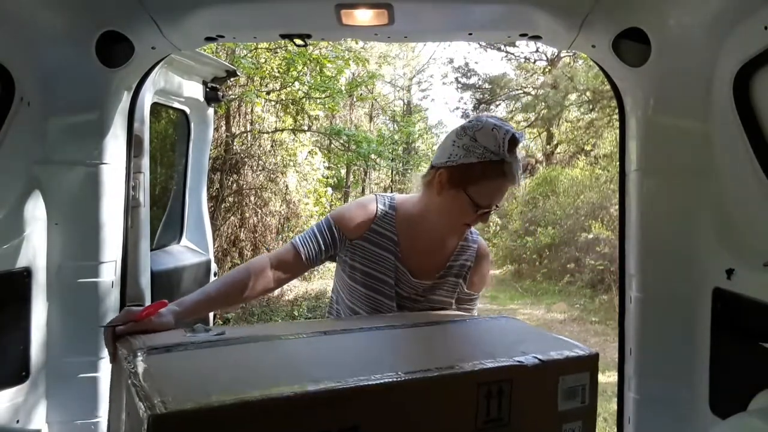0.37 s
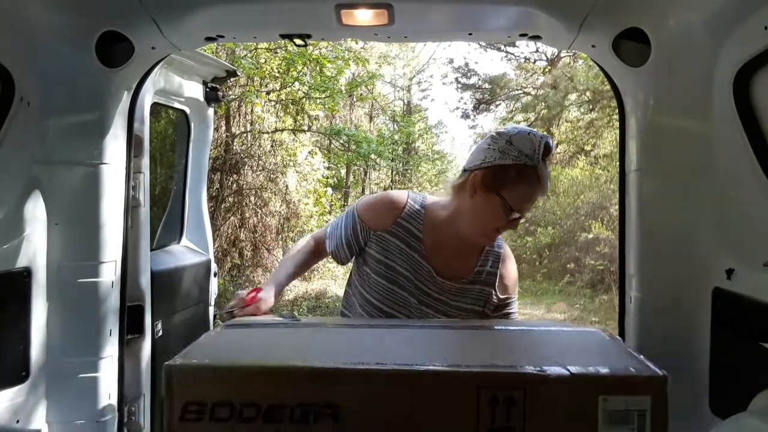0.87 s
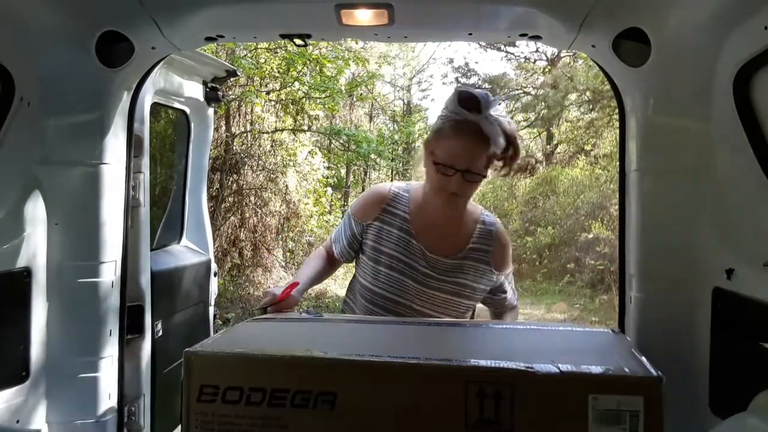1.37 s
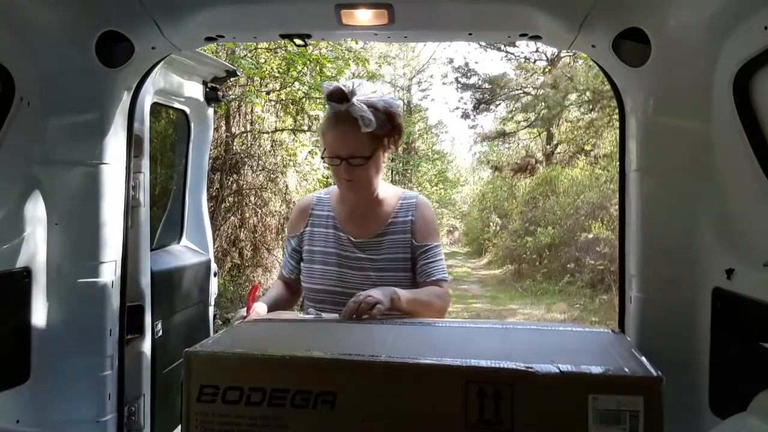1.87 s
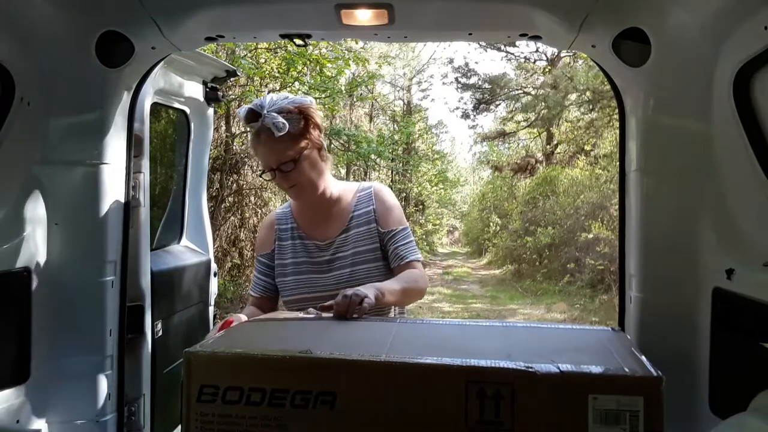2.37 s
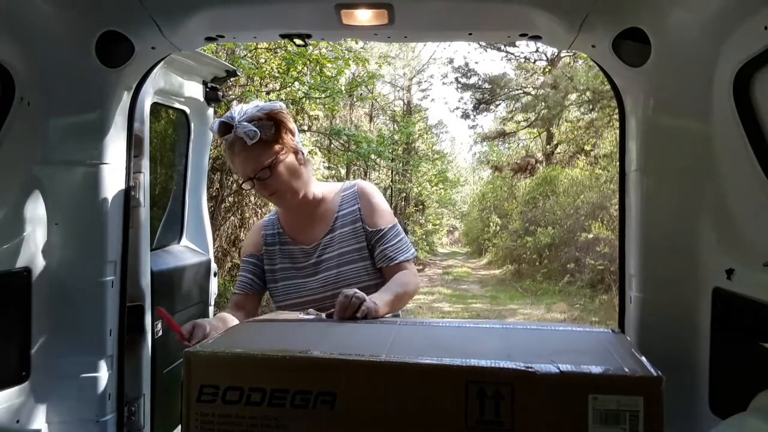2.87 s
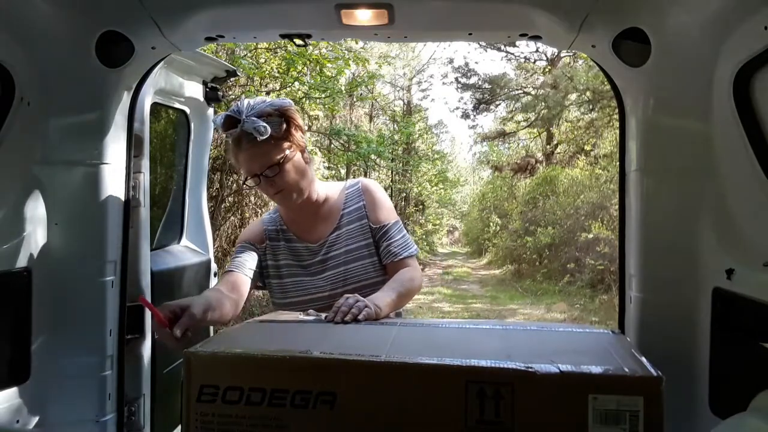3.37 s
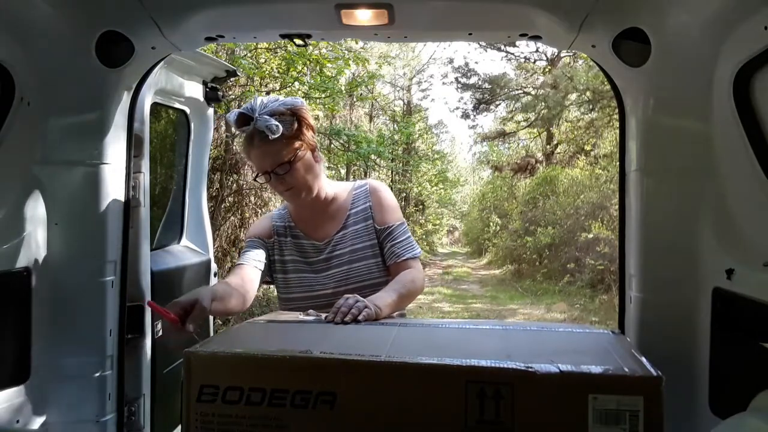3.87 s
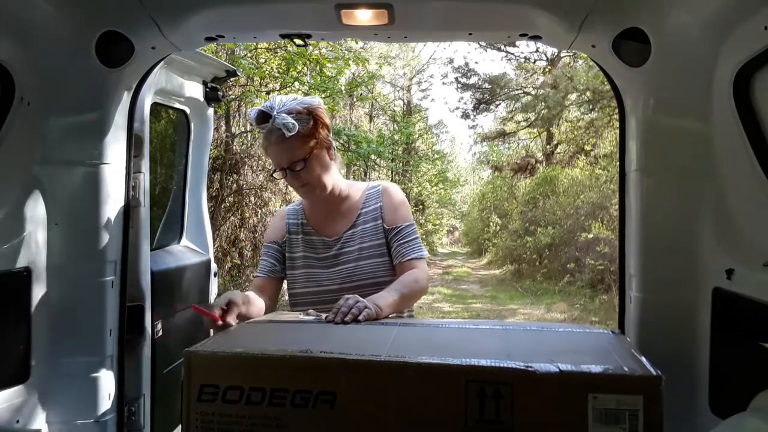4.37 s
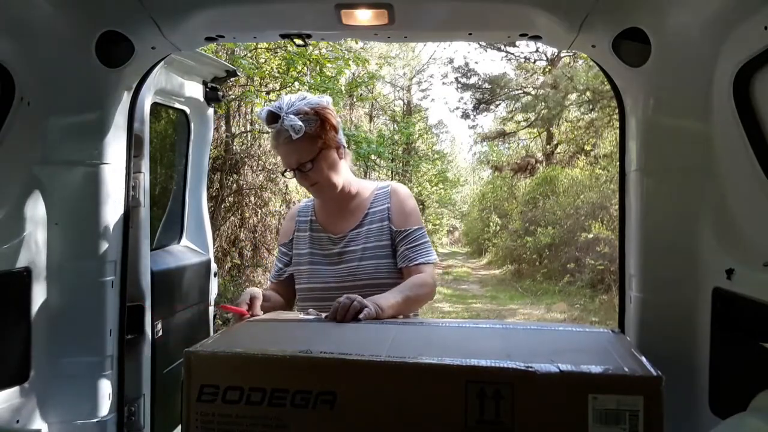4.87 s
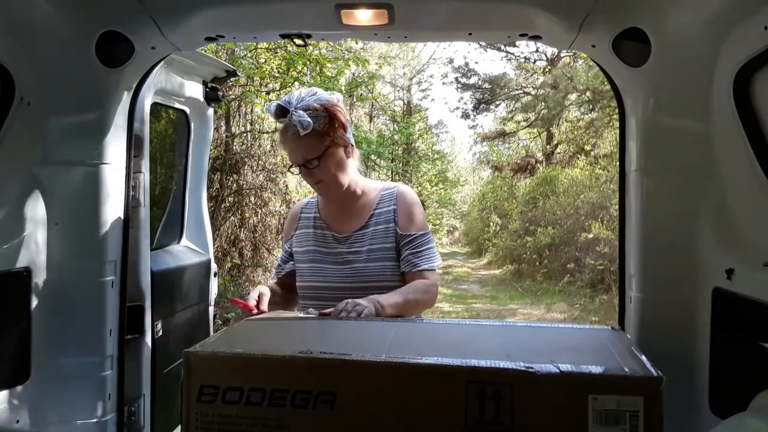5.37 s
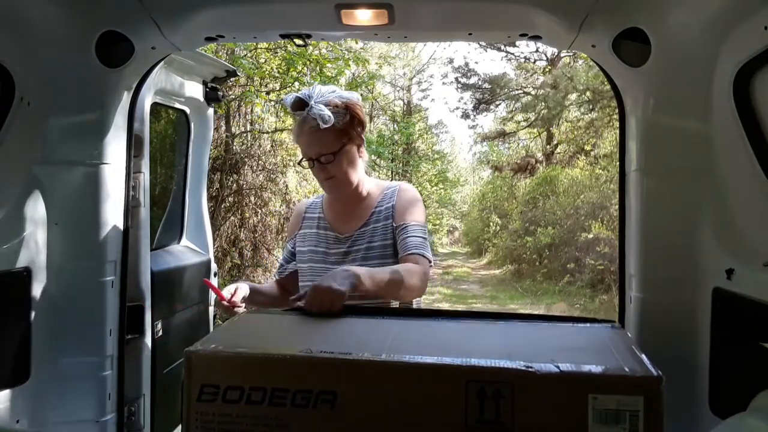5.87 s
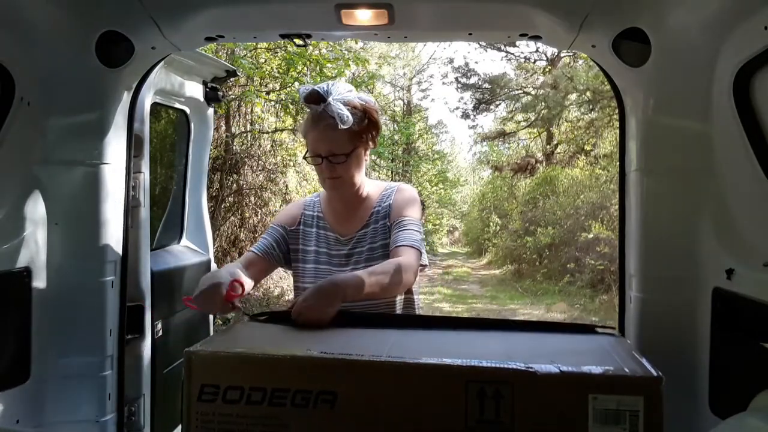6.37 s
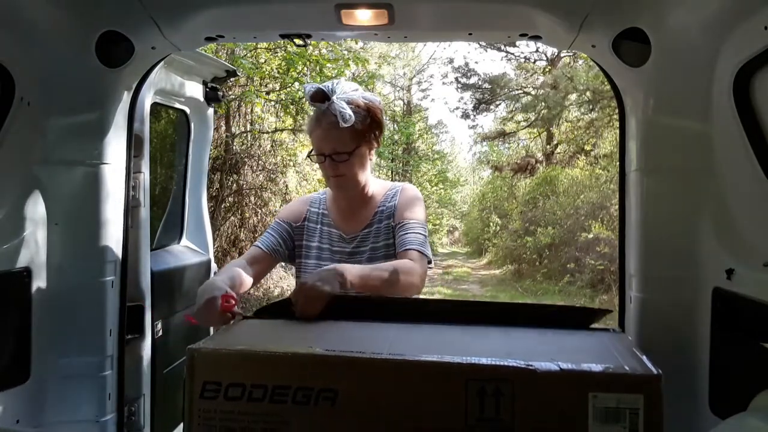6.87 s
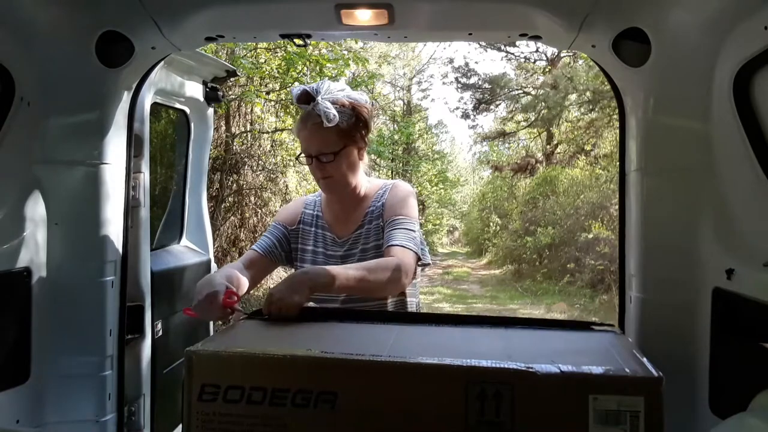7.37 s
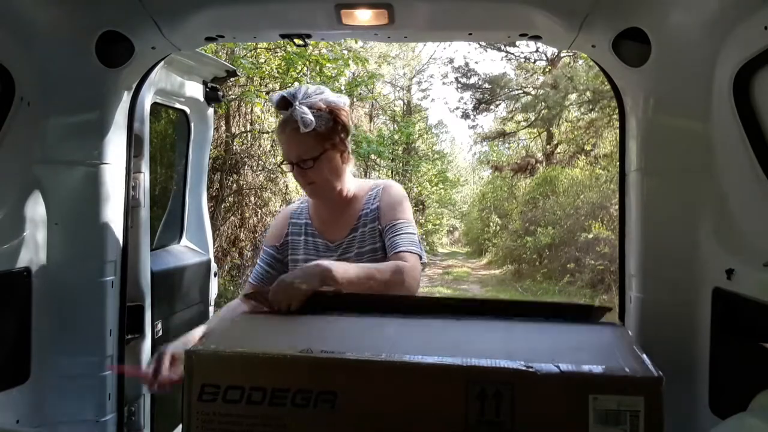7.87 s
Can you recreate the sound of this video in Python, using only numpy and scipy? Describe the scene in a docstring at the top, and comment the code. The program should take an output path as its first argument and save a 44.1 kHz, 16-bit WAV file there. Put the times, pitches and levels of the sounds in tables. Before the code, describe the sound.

Heard close inside the open back of a van: a large cardboard box is brushed, then dragged round with hollow scraping and dull knocks. Light rustles and a quiet gap follow. A scissor blade rasps along a taped seam, hands fumble at the flaps, and tape cracks before one hard, boomy knock. Faint leaves and distant rumble lie outside, with a very weak insect rasp midway.

```python
"""Hands and flaps brush a large cardboard box; then it is dragged round in the open back of a van, a scissor
blade is drawn along its taped seams, and flaps are knocked and pulled until the tape snaps. Friction and
blows are shaped noise: they excite the box's damped modes, and rasp and hiss directly at the contact.
The bare metal cabin answers with brief decaying noise; outside, filtered noise gives leaves, far-off
rumble and insects that rasp faintly in one band."""
import sys
import numpy as np
from scipy import signal
from scipy.fft import rfft, irfft
from scipy.io import wavfile
from scipy.ndimage import uniform_filter1d

SR = 44100
rng = np.random.default_rng(int(sys.argv[2]) if len(sys.argv) > 2 else 0)


def gain_from_db(level_db):
    """Turn a decibel level (scalar or array-like) into a linear amplitude factor."""
    decades = np.asarray(level_db, float) / 20
    return 10 ** decades


def inscribe(sig):
    """Save sig as 16-bit PCM at rate SR to the path in sys.argv[1].

    A 1-D sig is mono; a 2-D sig holds one channel per row.
    Samples are clipped to [-1, 1] before scaling.
    """
    pcm = np.round(np.clip(np.atleast_2d(sig).T, -1, 1) * 32767)
    wavfile.write(sys.argv[1], SR, pcm.astype(np.int16))


N = 352359
T = np.arange(N) / SR

# Leaves and far-off rumble, spectrum: hz, level_db
OUTSIDE_SPECTRUM = [(15, -43.5), (25, -3), (131, 1), (368, -11), (553, -11), (952, -15), (12600, -21),
                    (16500, -22)]
OUTSIDE_DB = -70.5
INSECT_HZ, INSECT_WIDTH_HZ, INSECT_DB = 2570, 700, -72.5
INSECT_FROM_S, INSECT_TO_S = 3.3, 5.2  # fullest between these times
INSECT_RISE_DB_PER_S, INSECT_FALL_DB_PER_S = 11, 12

# Cabin: decay time, build-up time constant, energy of the mid reflections
CABIN_T60_S, CABIN_BUILD_S, CABIN_DB = 0.12, 0.0045, 1.54
ALIKE_HZ = 800  # well below this the two channels are nearly alike

# An edge catches on the card and sings in one band: middle_s, spread_s, level_db, pitch_hz, width_hz
EDGE_BITES = [(0.018, 0.13, -51, 940, 302), (0.645, 0.062, -35, 1290, 695), (1.343, 0.15, -44.5, 643, 316),
              (1.805, 0.039, -51, 2110, 300), (4.007, 0.11, -39, 980, 597),
              (4.12, 0.055, -41.5, 2000, 1200), (6.033, 0.0058, -23, 630, 162),
              (6.056, 0.0091, -34.5, 14000, 3490), (7.554, 0.0077, -28, 1400, 700)]

# Long strokes, the box dragged round, then the blade along the seam; each a list of
# start_s, pressure_db, slip_db
LONG_STROKES = [
    [(0.39, -51, -6), (0.405, -29.5, -26.5), (0.45, -32.5, -17), (0.615, -37, -2.5), (0.79, -39, 5),
     (0.92, -38.5, 2), (0.97, -30, -10.5), (1.06, -30, -16), (1.15, -40.5, -27), (1.2, -34.5, -29.5),
     (1.3, -36.5, -34), (1.46, -42.5, -59.5), (1.69, -56, -50.5), (1.72, -70, -30.5)],
    [(3.57, -84, -12), (3.63, -56, -5), (3.67, -62, -9.5), (3.685, -46.5, -10), (3.83, -45, -11.5),
     (3.99, -38, -7.5), (4.29, -36.5, -5), (4.31, -40.5, -7), (4.36, -49, -10.5), (4.434, -36.5, -19.5),
     (4.49, -41.5, -8.5), (4.568, -39.5, 0), (4.62, -40, -3), (4.89, -42.5, -4), (4.95, -37, -9),
     (5.088, -39, -9), (5.14, -61, -26.5), (5.17, -75, -17)],
]
# Hands and flaps brush the card: start_s, length_s, pressure_db, slip_db
HAND_BRUSHES = [(.01, 0.09, -52, -4.5), (0.145, 0.14, -55.5, -2.5), (0.317, 0.17, -52, -5.5),
                (1.613, 0.013, -53, -8.5), (1.725, 0.065, -40.5, -2), (1.776, 0.085, -36.5, -20),
                (1.905, 0.046, -49.5, -6), (2.028, 0.062, -55.5, 0.5), (2.117, 0.11, -57, -4),
                (2.29, 0.014, -61.5, -2.5), (2.358, 0.051, -56, -7.5), (2.6, 0.017, -58.5, -3),
                (2.68, 0.28, -66.5, -7), (5.179, 0.062, -50.5, -7), (5.279, 0.074, -46.5, -3.5),
                (5.424, 0.073, -56, -1), (5.541, 0.12, -48.5, -6.5), (5.642, 0.06, -46.5, -4),
                (5.753, 0.081, -52, 3), (5.863, 0.11, -54.5, 7.5), (6.08, 0.03, -51, -4.5),
                (6.19, 0.043, -47, -4), (6.318, 0.15, -68.5, -1.5), (6.595, 0.064, -59, 4.5),
                (6.734, 0.13, -47.5, -3), (6.912, 0.091, -47, -23), (7.15, 0.09, -39, -16),
                (7.216, .12, -42, -7.5), (7.347, 0.12, -44, -17), (7.486, 0.027, -57, 2.5),
                (7.572, 0.069, -37.5, -6.5), (7.661, 0.11, -49.5, -4.5), (7.805, 0.089, -57.5, -7),
                (7.91, 0.085, -47.5, -5.5)]
BRUSH_RISE_DB_PER_S, BRUSH_SAG_DB, BRUSH_FALL_DB_PER_S = 455, 3, 297.5
# Slip lifts the hiss dB for dB and the rasp by this share, up to free sliding (0 dB)
RASP_SHARE, STROKE_RASP_DB, BRUSH_RASP_DB = 0.79, 2.5, -1.5

# A palm or the whole box lands and the big panels thud: start_s, level_db, push_ms
PANEL_THUDS = [(1.818, -50, 9.8), (4.431, -41.5, 4.7), (7.539, -40, 13)]
# Hands reach mostly the top panel, little of the big sides: hz, level_db
TOUCH_SPECTRUM = [(60, 2), (380, -4), (570, -0.5), (800, -3.5), (1500, -1), (2500, -21)]
TOUCH_DB = -9.5

# Knocks and snaps; dull blows boom, sharp ones snap. Each layer stretches the contact time by its own factor:
# start_s, strength_db, sharpness_db, contact_ms
BLOWS = [(0.136, -40, -12, 16), (0.403, -20, -64, 2.8), (0.463, -21.5, -50, 4.6), (0.498, -27, -42.5, 4),
         (0.537, -26.5, -42.5, 4), (1.049, -22, -18, 5.7), (1.182, -21, -35, 26), (1.259, -24, -33.5, 7.7),
         (1.338, -25.5, -51, 9), (1.812, -22, -27, 5.8), (1.858, -27.5, -16.5, 19), (1.878, -21, -14, 7.6),
         (2.215, -33, -37, 8.1), (2.252, -44.5, 15, 6.1), (2.362, -38.5, -49, 9.1), (2.71, -53, -30, 15),
         (2.818, -55, -22, 12), (2.912, -52, -15, 18), (3.299, -46, 15.5, 11), (3.678, -43, -11, 9.9),
         (4.304, -26.5, 6, 11), (4.377, -31.5, -17.5, 20), (4.407, -27, -11.5, 43), (4.43, -25, -14, 13),
         (5.057, -26, -23, 9.3), (5.307, -33.5, -18.5, 18), (5.348, -31.5, -22.5, 59),
         (5.638, -29.5, -31, 6), (5.652, -37.5, 17, 13), (5.722, -36, 14, 10), (5.735, -28.5, -11.5, 9.7),
         (5.995, -38.5, 11.5, 12), (6.009, -32.5, -4, 33), (6.027, -18, -5.5, 12.5),
         (6.053, -27.5, 15, 15.3), (6.173, -46.5, -1.5, 14), (6.219, -29, -22.5, 20),
         (6.722, -38.5, -11, 6.8), (6.903, -34.5, -38, 21), (6.925, -34.5, -10, 8.4),
         (7.044, -19, 13.5, 17.5), (7.168, -31, -13, 20), (7.209, -39, -2, 15), (7.532, -20.5, 0, 20),
         (7.537, -10, -16, 8.1), (7.547, -18.5, -5.5, 8.7), (7.553, -15, -25.5, 16), (7.935, -36, -27, 8),
         (7.707, -39, 13, 11)]
CRACK_DB, CRACK_SHARE = -3.5, 0.62  # the crack is strongest between dull and sharp
# The dragged load sticks and jerks free; inside a contact the fibres crackle
JERKS_PER_S, JERK_DB, CRACKLE_DB = 110, -6, 1.7

# Modes of the box panels and air: pitch_hz, level_db, t60_s
BOX_MODES = [(80.4, -22.5, 0.22), (148.4, -9, 0.034), (276, -7, 0.058), (317, -8.5, 0.09),
             (387.6, 0, 0.031), (480.5, 0, 0.04), (555.6, 1, 0.043), (681, 2, 0.021), (785, -5.5, 0.038),
             (926, -5, 0.027), (1160, -3.5, 0.015), (1375, -5, 0.01)]
BOX_TOP_HZ = 1900  # the soft card's ring rolls off above this
# Rasp at the contact, spectrum: hz, level_db
RASP_SPECTRUM = [(300, -29.5), (700, -1), (1200, -1), (2000, -2.5), (3200, -7), (6000, -32.5)]
# Hiss at the contact, spectrum: hz, level_db
HISS_SPECTRUM = [(900, -18), (1600, -8.5), (2500, -7), (4000, 0), (6000, -3), (7900, -2.5), (9600, -10.5),
                 (11500, -4.5), (14800, -6.5), (16000, -10), (16500, -47)]
# Tearing tape is brighter than rubbing, filter ahead of the hiss: hz, level_db
SNAP_SPECTRUM = [(3000, -0.5), (8000, 2), (13000, 4)]


def unit(x):
    """Normalisation: scale to rms 1."""
    return x / np.sqrt(np.mean(x ** 2))


def colour(x, points):
    """Minimum-phase filtering: a causal response through (Hz, dB) points, with unit power gain."""
    hz, db = np.transpose(points)
    grid_hz = np.linspace(1, SR / 2, 2049)
    log_gain = np.log(gain_from_db(np.interp(np.log(grid_hz), np.log(hz), db)))
    # folding the cepstrum onto positive times makes the response causal
    cepstrum = irfft(log_gain)
    cepstrum[1:2048] *= 2
    cepstrum[2049:] = 0
    response = irfft(np.exp(rfft(cepstrum)))
    return signal.oaconvolve(x, response / np.linalg.norm(response))[:N]


def walk(rate_hz):
    """Slow random modulation: levels held for 1 / rate_hz seconds, then slewed to rms 1."""
    hold = int(SR / rate_hz)
    levels = np.repeat(rng.standard_normal(N // hold + 1), hold)[:N]
    return unit(uniform_filter1d(levels, hold))


def grains(spread_db, judder_db, judder_hz):
    """Granular friction: dense fibre catches of uneven size, their grip coming and going."""
    size = gain_from_db(spread_db * rng.exponential(size=N) + judder_db * walk(judder_hz))
    return unit(size * rng.standard_normal(N))


def pair(mid, side):
    """Stereo coherence: nearly alike in the bass, less so in the treble; bass leans left, treble right."""
    high = signal.butter(1, ALIKE_HZ, "high", fs=SR, output="sos")
    spread = 0.55 * side + 0.7 * signal.sosfilt(high, side)
    lean = 0.028 * mid - 0.12 * signal.sosfilt(high, mid)
    side = spread + lean
    return np.array([mid + side, mid - side])


def insects():
    """Band-limited noise under amplitude modulation: a rasp that swells and flutters in one band."""
    edges = [INSECT_HZ - INSECT_WIDTH_HZ / 2, INSECT_HZ + INSECT_WIDTH_HZ / 2]
    bandpass = signal.butter(2, edges, "band", fs=SR, output="sos")
    band = signal.sosfilt(bandpass, rng.standard_normal((2, N)))
    rise_db = INSECT_RISE_DB_PER_S * np.minimum(T - INSECT_FROM_S, 0)
    fall_db = INSECT_FALL_DB_PER_S * np.maximum(T - INSECT_TO_S, 0)
    flutter_db = 4.2 * walk(25) + 1.2 * walk(9.2)
    return gain_from_db(INSECT_DB + rise_db - fall_db + flutter_db) * unit(band)


def outside():
    """Incoherent distant sources sum to noise: leaves and rumble waver a little, with insects on top."""
    mid = colour(rng.standard_normal(N), OUTSIDE_SPECTRUM)
    side = colour(rng.standard_normal(N), OUTSIDE_SPECTRUM)
    return gain_from_db(OUTSIDE_DB + 1.4 * walk(8.3)) * pair(mid, side) + insects()


def echoes():
    """Diffuse decay: direct sound, then noise that thickens and fades, one response for mid, one for side."""
    t = np.arange(SR // 6) / SR
    tail = rng.standard_normal((2, len(t))) * gain_from_db(-60 * t / CABIN_T60_S)
    tail *= 1 - np.exp(-t / CABIN_BUILD_S)
    tail *= gain_from_db(CABIN_DB) / np.linalg.norm(tail[0])
    # the direct sound reaches one channel a few samples early
    tail[0, 4], tail[1, 0], tail[1, 8] = 1.1, -0.5, 0.5
    return tail


def cabin(x):
    """Time-varying reflection: hands and box keep moving, so one echo pattern fades into another."""
    hop = SR // 40
    fade = np.sqrt(np.hanning(2 * hop + 1)[:-1])
    x, out = np.pad(x, (hop, 2 * hop)), np.zeros((2, N + SR))
    for i in range(0, N + hop, hop):
        heard = signal.fftconvolve([fade * x[i:i + 2 * hop]], echoes(), axes=1)
        out[:, i:i + heard.shape[1]] += heard
    mid, side = out[:, hop:hop + N]
    return gain_from_db(-5.0) * pair(mid, gain_from_db(-0.5) * side)


def bites():
    """Resonant filtering: fibre catches excite the band of each bite, swelling and fading."""
    catches, out = grains(spread_db=1.4, judder_db=3.5, judder_hz=70), np.zeros(N)
    for middle_s, spread_s, db, hz, width_hz in EDGE_BITES:
        # band edges whose geometric mean is the pitch
        low_hz = np.hypot(hz, width_hz / 2) - width_hz / 2
        bandpass = signal.butter(2, [low_hz, low_hz + width_hz], "band", fs=SR, output="sos")
        swell = np.exp(-0.5 * ((T - middle_s) / spread_s) ** 2)
        out += gain_from_db(db) * swell * unit(signal.sosfilt(bandpass, catches))
    return out


def friction_power(pressure_db, slip_db, rasp_db):
    """Partition of friction power into box, rasp and hiss: slip moves the sound from boom to hiss."""
    rasp_level_db = pressure_db + rasp_db + RASP_SHARE * np.minimum(slip_db, 0)
    return gain_from_db(2 * np.array([pressure_db, rasp_level_db, pressure_db + slip_db]))


def rubbing():
    """Addition of incoherent powers: amplitudes of strokes on the box, brushes on the box, rasp and hiss."""
    power = np.zeros((3, N))
    for start_s, db, slip_db in map(np.transpose, LONG_STROKES):
        pressure_db = np.interp(T, start_s, db, -200, -200)  # silent outside the stroke
        power += friction_power(pressure_db, np.interp(T, start_s, slip_db), STROKE_RASP_DB)
    stroke = np.sqrt(power[0])
    power[0] = 0  # from here on this row holds the brushes alone
    for start_s, length_s, db, slip_db in HAND_BRUSHES:
        near = slice(max(int((start_s - 0.2) * SR), 0), int((start_s + length_s + 0.3) * SR))
        t = T[near] - start_s
        rise_db = BRUSH_RISE_DB_PER_S * np.minimum(t, 0)
        sag_db = BRUSH_SAG_DB * np.clip(t / length_s, 0, 1)
        fall_db = BRUSH_FALL_DB_PER_S * np.maximum(t - length_s, 0)
        pressure_db = db + rise_db - sag_db - fall_db
        power[:, near] += friction_power(pressure_db, slip_db + 0 * t, BRUSH_RASP_DB)
    brush, rasp, hiss = np.sqrt(power)
    return stroke, brush, rasp, hiss


def bursts(levels_db, edge, stretch):
    """Impact excitation: a sharp first edge, then a crumple that dies away over the stretched contact time."""
    force = np.zeros(N + SR)
    t = np.arange(SR // 4) / SR
    noise = rng.standard_normal((len(BLOWS), len(t)))
    catches = rng.exponential(size=(len(BLOWS), len(t) // 32 + 1))
    catches = np.repeat(catches, 32, axis=1)[:, :len(t)]
    crumples = unit(noise * gain_from_db(CRACKLE_DB * catches))
    for (start_s, *_, contact_ms), db, crumple in zip(BLOWS, levels_db, crumples):
        shape = crumple * np.exp(-(1000 * t / (stretch * contact_ms)) ** 2)
        shape *= 1 - np.exp(-t / 0.0014)
        shape[0] = edge
        start = int(start_s * SR)
        force[start:start + len(t)] += gain_from_db(db) * shape
    return force[:N]


def weight(light, heavy):
    """Force coupling: hands move mostly the top panel, strokes and thuds the whole box."""
    thuds = np.zeros(N)
    for start_s, db, push_ms in PANEL_THUDS:
        push = np.hanning(int(push_ms * SR / 1000))
        start = int(start_s * SR)
        # times its length, so that the slope taken below does not depend on push_ms
        thuds[start:start + len(push)] += gain_from_db(db) * push * len(push)
    return gain_from_db(TOUCH_DB) * colour(light, TOUCH_SPECTRUM) + heavy + np.diff(thuds, prepend=0)


def box(force):
    """Modal synthesis: damped panel and air modes, their balance drifting as the point of contact moves."""
    out, power = 0, 0
    for k, (hz, db, t60_s) in enumerate(BOX_MODES):
        pole = np.exp(2j * np.pi * hz / SR - np.log(1000) / (t60_s * SR))
        ring = signal.lfilter([1], [1, -pole], force * gain_from_db(1.45 * walk(6))).imag
        out = out + (-1) ** k * gain_from_db(db) * ring
        power += gain_from_db(db) ** 2 / (2 - 2 * abs(pole) ** 2)
    lowpass = signal.butter(2, BOX_TOP_HZ, fs=SR, output="sos")
    return signal.sosfilt(lowpass, out) / np.sqrt(power)


def cardboard():
    """Source and resonator: rubbing and blows share the box; rasp and hiss radiate straight from the contact."""
    stroke, brush, rasp, hiss = rubbing()
    db, sharp_db = np.array(BLOWS)[:, 1:3].T
    knock_db = db - np.maximum(sharp_db, 0)
    snap_db = db + np.minimum(sharp_db, 0)
    crack_db = db + CRACK_DB - CRACK_SHARE * np.abs(sharp_db)

    grip = grains(spread_db=2.5, judder_db=1.8, judder_hz=70.35)
    jerks = (rng.random(N) < JERKS_PER_S / SR) * rng.uniform(-1, 1, N)
    light = brush * grip + bursts(knock_db, edge=9.3, stretch=0.3)
    heavy = stroke * (grip + gain_from_db(JERK_DB) * unit(jerks))
    boom = box(weight(light, heavy))

    rasping = rasp * grains(spread_db=2.5, judder_db=1.5, judder_hz=59.7)
    cracks = bursts(crack_db, edge=4.7, stretch=0.9)
    scrape = colour(rasping + cracks, RASP_SPECTRUM)

    hissing = hiss * grains(spread_db=2.5, judder_db=1.67, judder_hz=29.85)
    snaps = colour(bursts(snap_db, edge=3.5, stretch=0.74), SNAP_SPECTRUM)
    sizzle = colour(hissing + snaps, HISS_SPECTRUM)
    return boom + scrape + sizzle + bites()


def scene():
    """Superposition: the box heard in the cabin, plus the sound outside."""
    return cabin(cardboard()) + outside()


def top_cut(x):
    """Nothing passes above the cut-off."""
    return signal.sosfilt(signal.butter(12, 17040, fs=SR, output="sos"), x)


def record(dry):
    """Final stage of the signal chain, applied to the finished mix."""
    return top_cut(dry)


dry = scene()
out = record(dry)
inscribe(out)
```